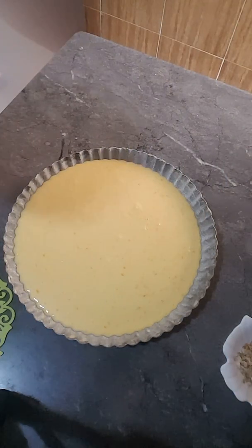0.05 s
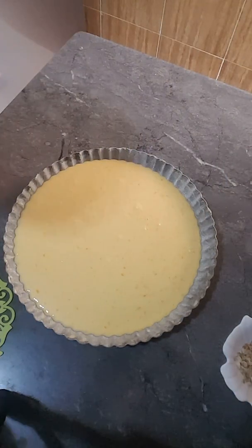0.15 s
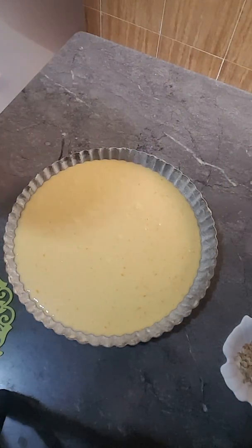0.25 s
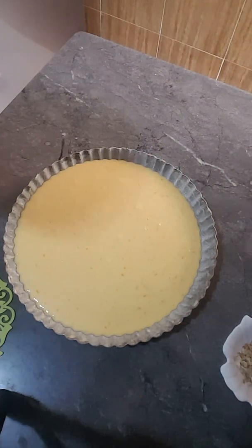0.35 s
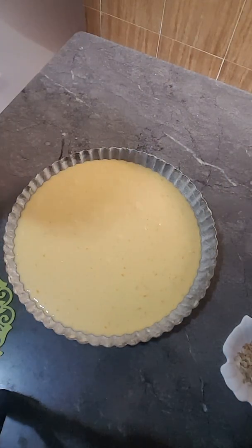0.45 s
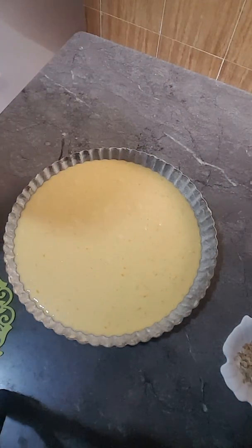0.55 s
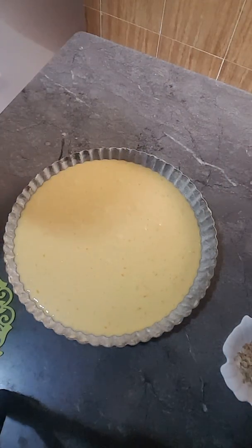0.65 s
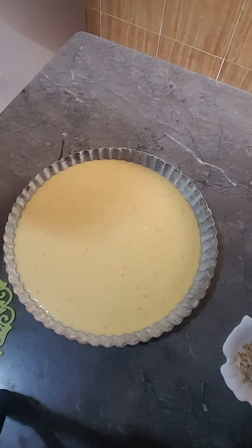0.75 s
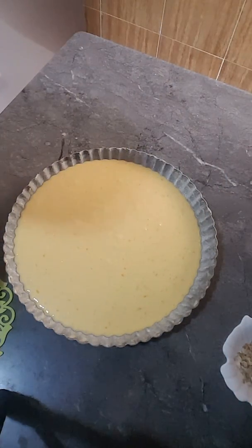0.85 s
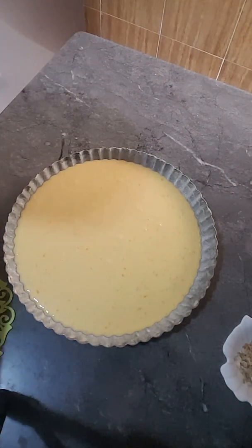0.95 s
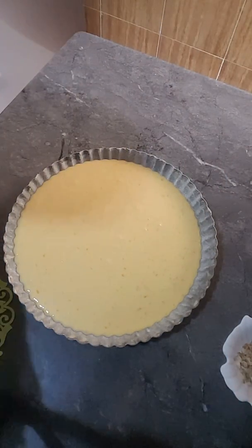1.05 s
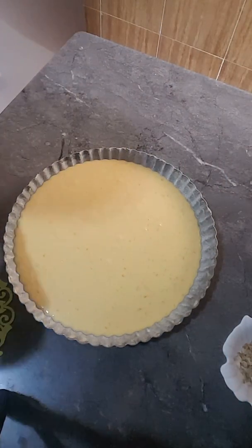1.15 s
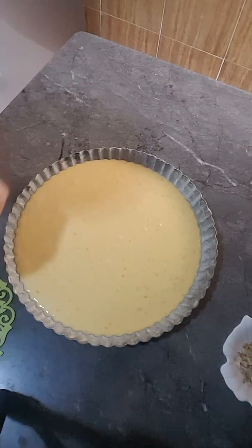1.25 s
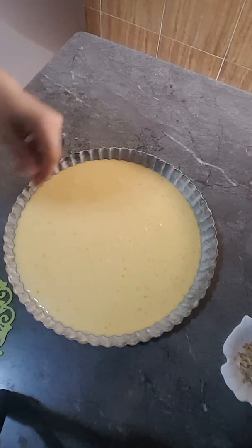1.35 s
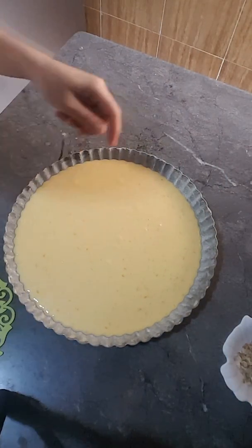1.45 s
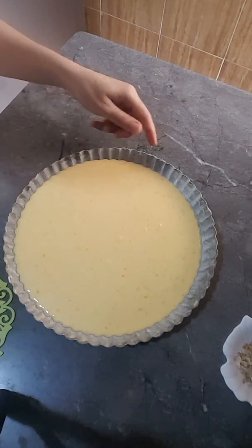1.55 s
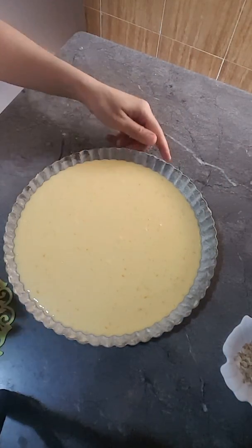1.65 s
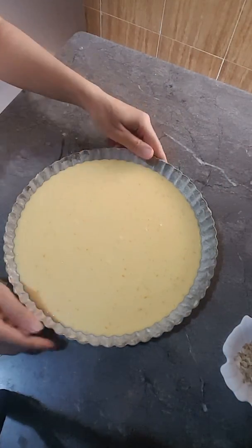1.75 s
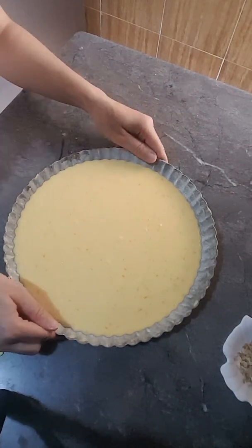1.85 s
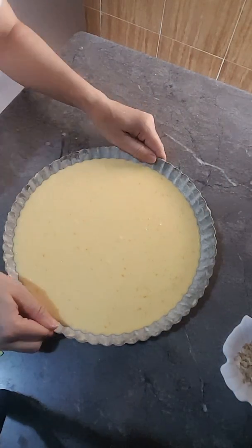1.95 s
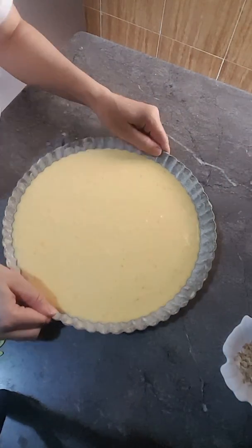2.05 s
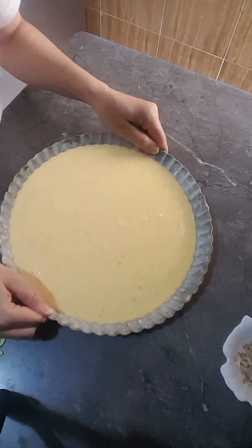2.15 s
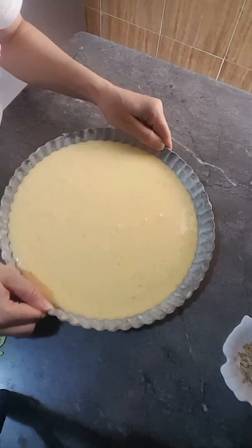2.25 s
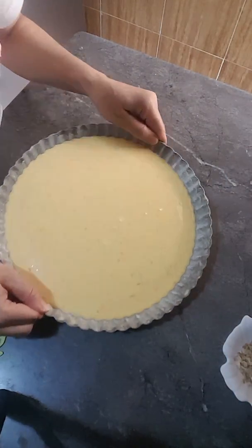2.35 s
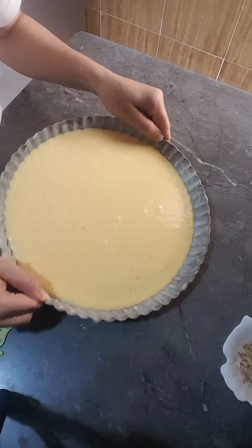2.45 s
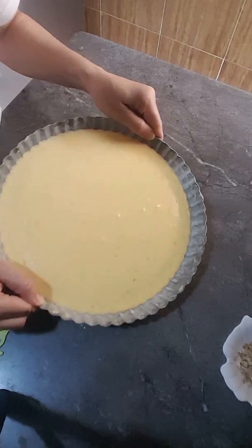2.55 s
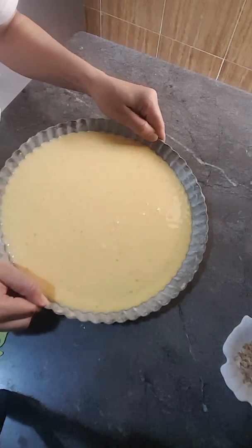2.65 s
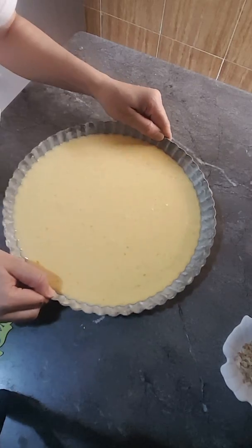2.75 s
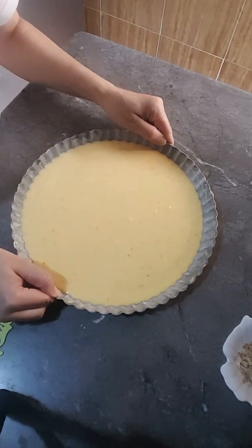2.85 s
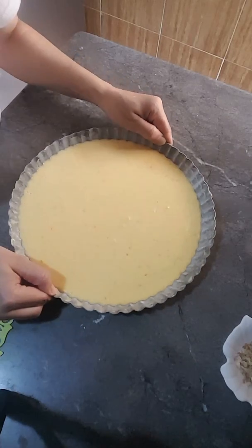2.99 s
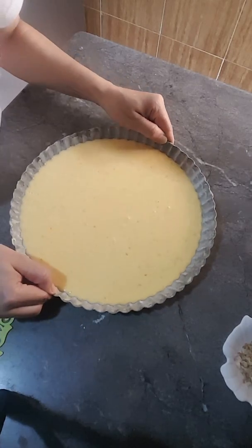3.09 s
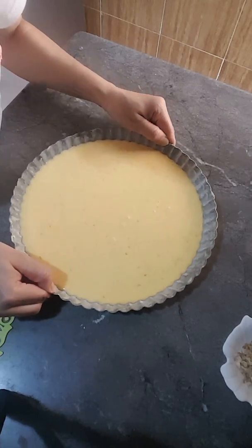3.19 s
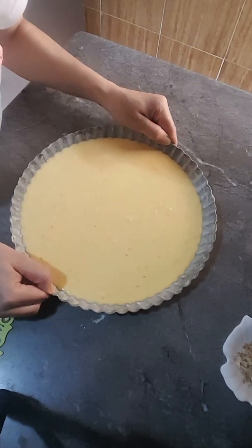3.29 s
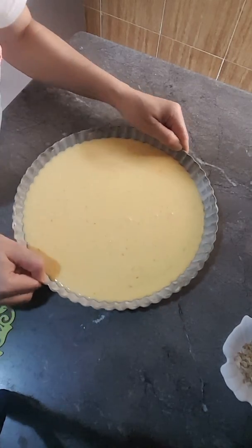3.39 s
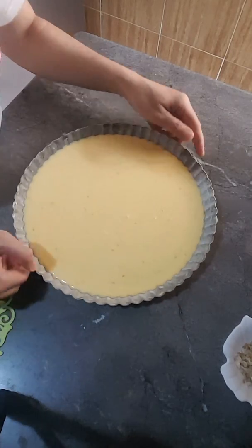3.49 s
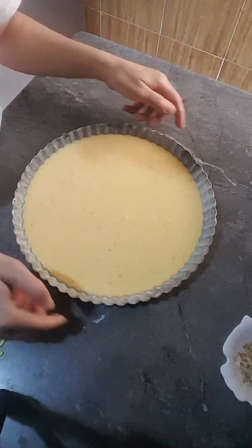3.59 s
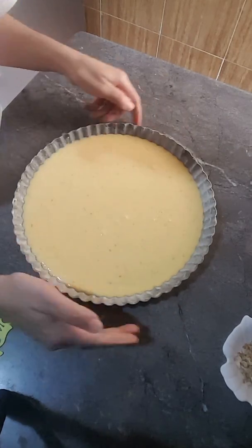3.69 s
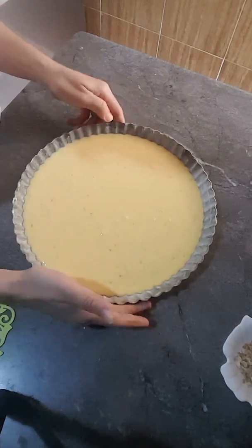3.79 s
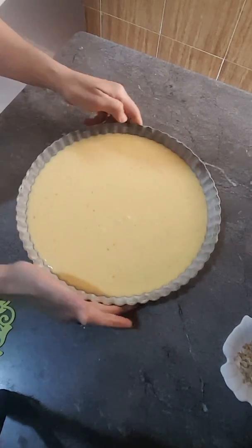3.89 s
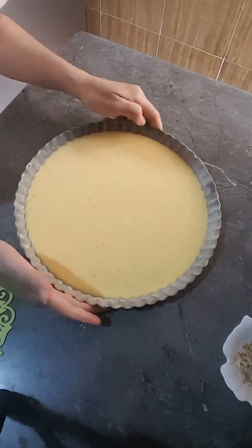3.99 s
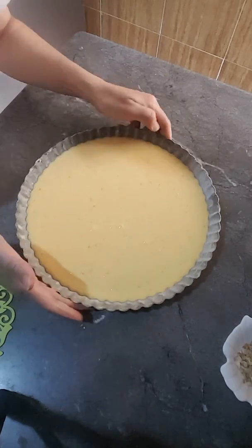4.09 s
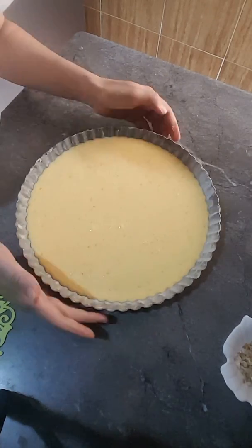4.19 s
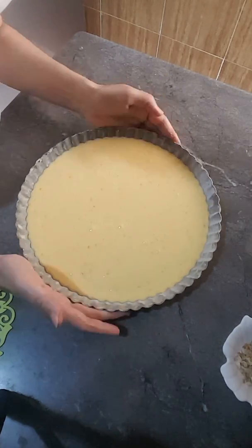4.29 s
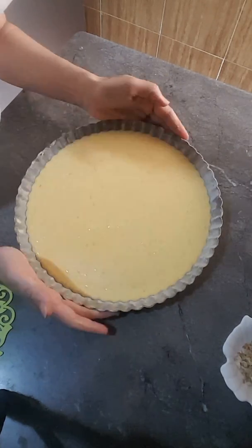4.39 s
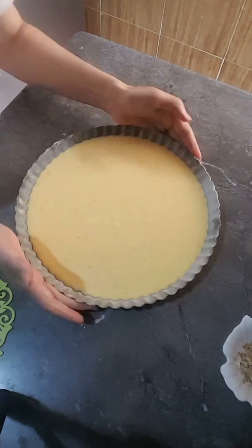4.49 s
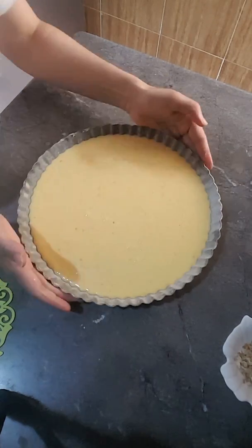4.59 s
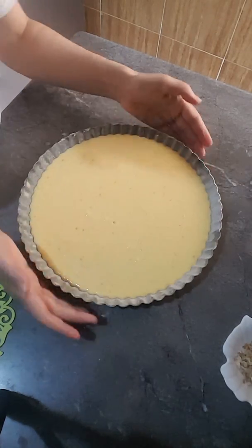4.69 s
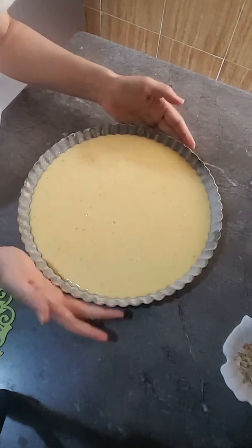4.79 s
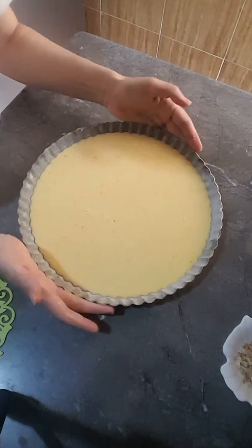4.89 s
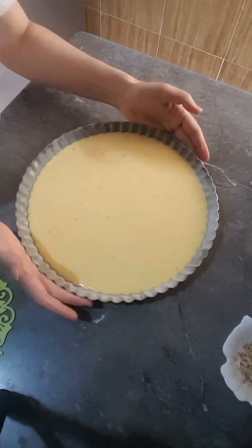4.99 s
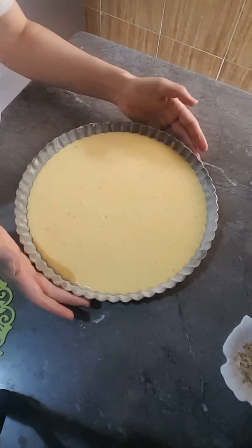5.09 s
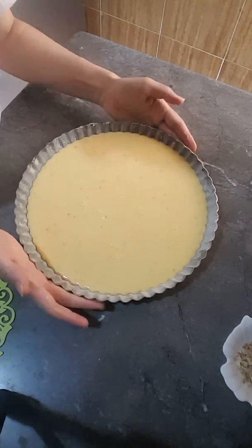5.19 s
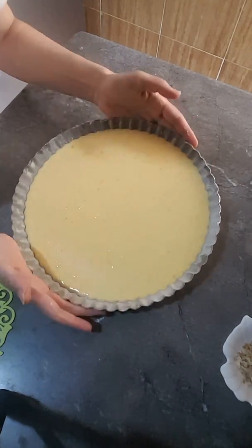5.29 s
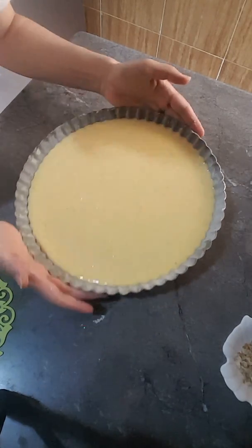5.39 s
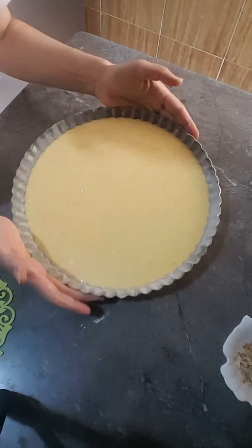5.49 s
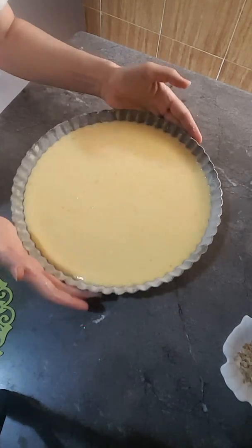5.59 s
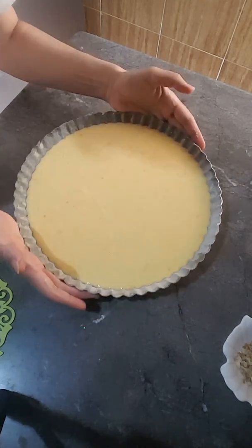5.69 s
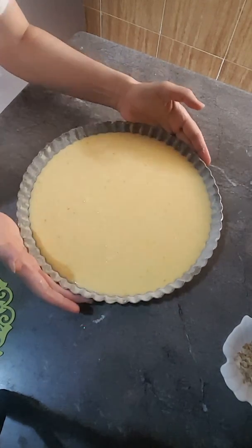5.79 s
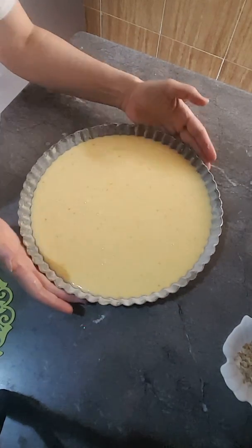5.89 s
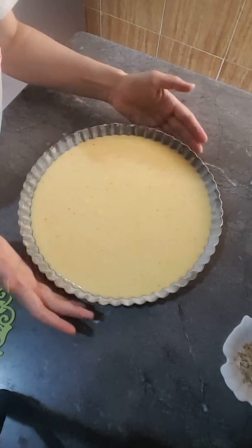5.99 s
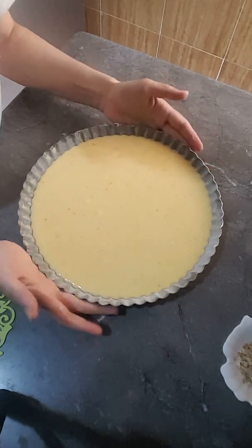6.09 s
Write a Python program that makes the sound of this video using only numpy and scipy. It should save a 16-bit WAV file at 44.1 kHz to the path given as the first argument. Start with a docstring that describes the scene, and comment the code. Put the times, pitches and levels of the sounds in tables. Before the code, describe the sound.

In a small tiled kitchen, a bowl clunks down softly, then a full fluted metal tin bangs and rattles briefly on stone, again and again.

```python
"""A spatula taps and wipes a bowl, which is put down; then a fluted metal tin of batter is lifted and dropped on stone.
Most drops land on the rim first with a clack, then slap flat and rattle to rest; the batter damps the ring.
Contacts drive the decaying modes and noisy crack of each vessel; rubs drive them with a swell of tiny catches.
The counter booms under the drops, and a small tiled kitchen answers with early reflections and a dense tail.
Filtered noise makes the still air, and wavering sines make the low hum of an appliance."""
import sys
import numpy as np
from scipy import signal
from scipy.fft import rfft, irfft
from scipy.io import wavfile

SR = 44100
rng = np.random.default_rng(int(sys.argv[2]) if len(sys.argv) > 2 else 0)


def dump(signal):
    """Clip the signal to [-1, 1] and save it as 16-bit WAV at the path in sys.argv[1]."""
    limited = np.clip(np.atleast_2d(signal).T, -1, 1)
    pcm = np.round(limited * 32767).astype(np.int16)
    wavfile.write(sys.argv[1], SR, pcm)


N = 270774

RING = 8192  # samples in one contact response
FREQS = np.fft.rfftfreq(RING, 1 / SR)
TOP_HZ = 15750  # top of the microphone's band
AIR_DB = -54.5  # rms of the still air before the microphone
SPOT_DB, SPOT_OCTAVES = 4.5, .17  # lift and half-width of the modes favoured by the point of contact
CHOKE_DB = 2  # extra damping at flatness 1, in proportion to flatness

# In the contact tables flatness is 0 on the rim, 0.5 on the heel of the bottom, 1 flat on the whole bottom;
# tick_db lifts the treble, and spot_hz is the mode favoured by the point of contact.
# single contacts of the tin on the stone: rim clacks, heel knocks, light touches and some rebounds:
# start_s, force_db, flatness (0-1), tick_db, spot_hz
TIN_KNOCKS = [(2.2805, 16.5, 0.05, -5, 1048), (2.538, 30.5, 0, 0, 1095), (2.7755, 14.5, .35, -12, 800),
              (2.9205, 29, 0, -7, 1350), (2.933, 33.5, 0.18, 3, 650), (2.997, 26, 0.6, 9, 330),
              (3.0835, 18.5, 0.52, -4, 1000), (3.119, 19.5, 0.69, -4.5, 487), (3.149, 12, 0.62, -4, 600),
              (3.262, 28.5, 0.06, -0.5, 1440), (3.301, 26.5, 0.62, 1.5, 686),
              (3.3305, 30.5, 0.14, 2.5, 1620), (3.4255, 28, 0.07, 5, 1600), (4.144, 24, 0, -2.5, 1040),
              (4.164, 28.5, 0.12, -4, 930), (4.627, 22.5, 0.07, -3.5, 1370), (4.907, 3, 1, -14, 330),
              (4.948, 3, 1, -15, 400), (5.0985, 33, 0.6, -3.5, 600), (5.11, 23, 0.14, 5.5, 1290),
              (5.329, 15, 0.74, -10, 620), (5.8927, 34, .18, -1, 700), (5.965, 7, 0.06, -0.5, 1080)]
# the tin comes down with its full weight: start_s, force_db, flatness (0-1), tick_db, spot_hz,
# boom_db (of the counter), rattle_db (first bounce relative to the blow)
TIN_DROPS = [(2.939, 37.5, 0.98, 1, 330, -34.5, -4.5), (3.438, 34.5, 0.71, 7, 316.3, -43, -6.5),
             (4.153, 33, 0.7, -9.5, 760, -21, -1.5), (4.6026, 40, 0.85, 5, 483, -21, -7.5),
             (5.116, 30, 0.7, -3.5, 349.7, -39, -9), (5.977, 36.5, 0.84, -5.5, 370, -23.5, -26)]
# the tin dragged over the stone: start_s, length_s, level_db
TIN_SLIDES = [(1.86, 0.13, -64.5), (3.11, 0.063, -51), (3.9, 0.081, -55.5), (4.4, 0.34, -54.5),
              (5.066, 0.049, -40.5)]
# modes of the filled tin, before scatter and further damping: pitch_hz, width_hz, level_db
TIN_MODES = [(202, 242, -1.5), (336, 31, -6.5), (388, 6.5, -3), (478, 250, 0), (432, 53, -2.5),
             (581.3, 76, -3.5), (686, 58, 0.5), (750, 26, -1.5), (845, 90, -3), (934, 6.4, 0),
             (1031.6, 42.5, 3), (1131, 16, -6), (1336, 32.8, 2.5), (1499, 13, -6.5), (1580, 56, -1.5),
             (1718, 100, -2.5), (2279, 56, -2.5), (2524, 110, -10.5), (2910, 150, -9.5), (3190, 88, -27)]
# drive of the tin, wider contacts favouring lower modes: pitch_hz, rim_db, heel_db, flat_db
TIN_DRIVE = [(118, -2, -7, -11), (370, -8, -3.5, 3.5), (666, 0.5, -1, -10.5), (970, -2, -5.5, -16.5),
             (1328, 2, -9.5, -16), (3010, -10, -24.5, -25.5)]
# the spatula knocks the bowl twice, then the bowl meets the counter:
# start_s, force_db, flatness (0-1), tick_db, spot_hz
BOWL_TAPS = [(0.002, 10, 0.02, -1, 590), (0.3205, 8, 0.06, 1.5, 530), (1.0865, 29, 0.4, -6.5, 2020)]
# the bowl tips onto its base and rocks: start_s, force_db, flatness (0-1), tick_db, spot_hz,
# boom_db (of the counter), rattle_db (first bounce relative to the blow)
BOWL_LANDINGS = [(1.106, 23, 0.99, -1, 380, -32.5, -14.5)]
# the spatula wiping the bowl: start_s, length_s, level_db
BOWL_WIPES = [(.02, 0.19, -52.5), (.46, 0.16, -59.5), (.92, 0.05, -65)]
# modes of the bowl, before scatter and further damping: pitch_hz, width_hz, level_db
BOWL_MODES = [(138, 96, -4), (203, 78, 5.5), (375, 16, -0.5), (393.65, 24.7, 8), (616, 33, -3),
              (697, 100, -0.5), (760, 130, -4.5), (985, 230, -4), (1300, 46, 3.5), (1780, 76, -1),
              (1966, 110, -3.5), (2310, 120, -4), (2780, 800, -10)]
# drive of the bowl, by width of contact: pitch_hz, rim_db, heel_db, flat_db
BOWL_DRIVE = [(120, -6, -4.5, -2), (330, 2.5, -0.5, 3.5), (650, 2, 0, -9), (960, -4, -6.5, -13),
              (1300, -2.5, -25.5, -20), (2080, -11, -10, -25), (3170, -9.5, -10, -28)]
# dense upper modes of either vessel: pitch_hz, level_db
UPPER_MODES = [(600, -24.5), (1500, -11), (2500, -14), (3500, -20.5), (4500, -25), (5700, -28.5),
               (7000, -44.5), (9500, -60), (12000, -49.5), (15500, -55)]
# first reflections from backsplash and cupboards: delay_ms, left_db, right_db
EARLY_ECHOES = [(3.3478, -14.5, -12.5), (8.95, -18.5, -16.5), (14.09, -11.5, -9.5), (23.86, -23, -16)]
# bands of the kitchen's dense tail, relative to the sound sent into it: pitch_hz, level_db, t60_s
TAIL_BANDS = [(49.8, 1.5, 0.19), (95.2, 7.5, 0.68), (200, -1.5, 0.46), (380, -6, 0.42), (730, -2, 0.41),
              (1458, -4, 0.41), (2980, -4, 0.43), (5920, -6, .42), (8950, -1, 0.3)]
# standing waves between the walls: pitch_hz, t60_s, level_db
STANDING_WAVES = [(94.66, 0.39, 12), (127, 0.19, 10), (174.7, 0.75, 9.5), (197, .25, -3.5),
                  (305.6, 0.28, 0), (332.5, 0.23, -3.5), (421, 0.45, 2.5), (518, 0.19, 1), (587, 0.21, 3.5)]
# left port minus right port: pitch_hz, difference_db
PORT_BALANCE = [(100, -0.5), (330, -2), (500, 0.5), (740, 3), (1130, -2), (1700, -7.5), (2600, -3.5),
                (5000, -6), (12000, -5)]
# spectral shape of the still air, relative: pitch_hz, level_db (per Hz)
AIR_SHAPE = [(25, -38), (45, -1.5), (75, -15), (100, -2.5), (170, -5.5), (260, -13), (400, -10),
             (520, -21.5), (750, -18), (1000, -25), (2500, -33), (5000, -42), (9500, -50), (13000, -46)]
# appliance hum, before its waver: pitch_hz, level_db (rms)
HUM_LINES = [(96.9, -60.5), (118.4, -66.5), (436, -70), (581.4, -71.5)]


def undb(db):
    """Decibels to gain."""
    return 10 ** (np.asarray(db) / 20)


def along(hz, points, axis=1):
    """Read one column of a table on a log-frequency axis."""
    table = np.array(points, float)
    return np.interp(np.log(np.maximum(hz, 1)), np.log(table[:, 0]), table[:, axis])


def causal(db):
    """Minimum-phase response with the given gains: nothing sounds before the blow."""
    cepstrum = irfft(np.log(undb(db)))
    cepstrum[1:RING // 2] *= 2
    cepstrum[RING // 2 + 1:] = 0
    return np.exp(rfft(cepstrum))


def add(out, s, sound):
    """Mix a sound in at time s."""
    i = max(int(s * SR), 0)
    out[:, i:i + sound.shape[1]] += sound[:, :N - i]


def tin():
    """The filled tin: single knocks, drops that chatter briefly, and drags over the stone."""
    drops = chatter(TIN_DROPS, count=4, gap_s=.0135, shrink=.85, loss_db=2.5, tilt=0.21, bounce_tick_db=2)
    hits = strikes(TIN_KNOCKS + drops, TIN_MODES, TIN_DRIVE, scatter_db=1.4, detune=0.013,
                   crack_s=0.006, damping=1.16, tick_hz=2983)
    return hits + rubs(TIN_SLIDES, TIN_MODES, grain_db=-1.5, dull_hz=600, damping=4.5)


def bowl():
    """The mixing bowl: wiped and tapped with the spatula, then put down to rock on its foot."""
    rocking = chatter(BOWL_LANDINGS, count=5, gap_s=.037, shrink=.9, loss_db=2.0, tilt=.85, bounce_tick_db=5.5)
    hits = strikes(BOWL_TAPS + rocking, BOWL_MODES, BOWL_DRIVE, scatter_db=1.54, detune=0.012,
                   crack_s=0.004, damping=1.18, tick_hz=4500)
    return hits + rubs(BOWL_WIPES, BOWL_MODES, grain_db=1, dull_hz=1300, damping=1.84)


def chatter(drops, count, gap_s, shrink, loss_db, tilt, bounce_tick_db, uneven=.08, wobble=0.21):
    """A blow and its bounces, ever weaker and at shrinking, slightly uneven gaps, as the angle wobbles."""
    contacts = []
    for s, force_db, flatness, tick_db, spot_hz, _, rattle_db in drops:
        contacts.append((s, force_db, flatness, tick_db, spot_hz))
        for k, (late, lean) in enumerate(rng.standard_normal((count, 2))):
            s = s + gap_s * shrink ** k * (1 + uneven * late)
            bounce_db = force_db + rattle_db - k * loss_db
            bounce_flatness = 1 - tilt + wobble * lean
            contacts.append((s, bounce_db, bounce_flatness, bounce_tick_db, spot_hz))
    return contacts


def strikes(contacts, modes, push, scatter_db, detune, crack_s, damping, tick_hz):
    """A flat landing pushes long, thuds and chokes the ring; a landing on the edge is short and clacks."""
    out = np.zeros((2, N))
    fade = np.minimum(1, np.linspace(2, 0, RING)) ** 2
    rim, heel, flat = (along(FREQS, push, axis=k + 1) for k in range(3))
    treble = along(FREQS, [(tick_hz / 2, 0), (tick_hz, 1)])
    for s, force_db, flatness, tick_db, spot_hz in contacts:
        # -1 on the rim, 0 on the heel, 1 flat
        lean = np.clip(2 * flatness - 1, -1, 1)
        extreme = flat if lean > 0 else rim
        push_db = heel + abs(lean) * (extreme - heel)
        octaves_off = np.log2(np.maximum(FREQS, 1) / spot_hz)
        spot_db = SPOT_DB / (1 + (octaves_off / SPOT_OCTAVES) ** 2)
        choked = damping * undb(CHOKE_DB * flatness)
        response = vessel(modes, scatter_db, detune, crack_s, damping=choked)
        drive = causal(force_db + push_db + spot_db + tick_db * treble)
        add(out, s, fade * irfft(response * drive))
    return out


def vessel(modes, scatter_db, detune, crack_s, damping=1, lag_ms=0.055, turn_hz=1000, radiate_hz=280,
           build_cycles=0.36, crack_rise_s=0.00069):
    """Response to one contact; where it lands shifts the weight and pitch of every mode."""
    t = np.arange(RING) / SR
    hz, width, db = np.array(modes, float).T[:, :, None]
    weight, pitch, left, right = rng.standard_normal((4, len(modes), 1))
    # each mode builds up as the bending wave crosses the vessel, then dies away
    build = 1 - np.exp(-t * hz / build_cycles)
    life = build * np.exp(-np.pi * width * damping * t) * np.sqrt(damping)
    rings = undb(db + scatter_db * weight) * 2 * np.pi * width / SR * life
    angle = 2 * np.pi * hz * (1 + detune * pitch) * t
    # low modes push the air together; higher ones radiate in lobes, with another phase at each port
    ring = rfft([(rings * np.sin(angle + port * hz / turn_hz)).sum(0) for port in (left, right)])
    ring *= causal(along(FREQS, [(3500, 0), (9000, -12.0)]))
    crack_shape = (1 - np.exp(-t / crack_rise_s)) * np.exp(-t / crack_s) * np.sqrt(2 / (crack_s * SR))
    crack = rng.standard_normal((2, RING)) * crack_shape
    response = ring + rfft(crack) * causal(along(FREQS, UPPER_MODES))
    # the left port is a little further away
    response[0] *= np.exp(-2j * np.pi * FREQS * lag_ms / 10 ** 3)
    # a small vessel radiates long waves poorly
    return response * 1j * FREQS / (radiate_hz + 1j * FREQS)


def rubs(strokes, modes, grain_db, dull_hz, damping):
    """Friction: a swell of tiny uneven catches, spread over three places on the hand-held vessel."""
    out = np.zeros((2, N))
    for s, length, db in strokes:
        size = int(length * SR)
        sound = 0
        for place in range(3):
            grains = rng.standard_normal(size) * undb(grain_db * rng.exponential(size=size))
            catches = grains * (rng.random(size) < .02)  # about one sample in fifty catches
            body = vessel(modes, scatter_db=2, detune=.03, crack_s=.005, damping=damping)
            body = irfft(body / (1 + 1j * FREQS / dull_hz))
            sound = sound + signal.fftconvolve((catches * np.hanning(size))[None], body, axes=1)
        rms = np.sqrt(np.sum(sound ** 2) / (2 * size))
        add(out, s, sound * undb(db) / rms)
    return out


def counter(drops, hz, t60, rise_s=0.01, overtone=1.5, overtone_db=-5):
    """The slab and its cabinet boom low under each drop, quickly damped; the pitch depends on the place."""
    out = np.zeros((2, N))
    t = np.arange(SR // 2) / SR
    swing = np.sin(2 * np.pi * hz * t) + undb(overtone_db) * np.sin(2 * np.pi * hz * overtone * t)
    boom = swing * (1 - np.exp(-t / rise_s)) * np.exp(-np.log(1000) * t / t60)
    for s, *_, boom_db, _ in drops:
        add(out, s, undb(boom_db) * boom[None] / boom.max())
    return out


def reflections(sound, dull_hz=3000):
    """Nearby surfaces repeat every knock, dulled, within a few hundredths of a second."""
    out = np.zeros((2, N))
    soft = signal.sosfilt(signal.butter(1, dull_hz, fs=SR, output="sos"), sound)
    for ms, left_db, right_db in EARLY_ECHOES:
        add(out, ms / 10 ** 3, soft * undb([[left_db], [right_db]]))
    return out


def kitchen(sound, first_s=0.0019, build_s=0.003):
    """Tiles and cupboards return a dense tail just after the direct sound; bass lingers in standing waves."""
    t = np.arange(SR) / SR
    hz, noise = diffuse(size=SR)
    onset = 1 - np.exp(-np.maximum(t - first_s, 0) / build_s)
    tail = 0
    for k, (_, db, t60) in enumerate(TAIL_BANDS):
        # each band crossfades into its neighbours
        share = along(hz, [(row[0], j == k) for j, row in enumerate(TAIL_BANDS)])
        fade = onset * np.exp(-np.log(1000) * t / t60)
        tail = tail + undb(db) * irfft(noise * share, SR) * fade / np.sqrt(np.sum(fade ** 2))
    for mode_hz, t60, db in STANDING_WAVES:
        decay = np.log(1000) / t60
        wave = onset * np.exp(-decay * t) * np.cos(2 * np.pi * mode_hz * t)
        tail = tail + undb(db) * 2 * decay / SR * wave
    return signal.fftconvolve(sound, tail, axes=1)[:, :N]


def diffuse(size, apart_hz=1000):
    """Spectra of noise from all sides at two ports: alike in the bass, unrelated in the treble."""
    hz = np.fft.rfftfreq(size, 1 / SR)
    alike = np.sinc(hz / apart_hz)
    mid, side = rfft(rng.standard_normal((2, size)))
    signs = np.array([[1], [-1]])
    return hz, (mid * np.sqrt(1 + alike) + signs * side * np.sqrt(1 - alike)) / np.sqrt(2)


def background(waver_db=2):
    """Still air as shaped diffuse noise, and an appliance hum wavering softly in level and phase."""
    t = np.arange(N) / SR
    hz, noise = diffuse(size=N, apart_hz=1268)
    air = irfft(noise * undb(along(hz, AIR_SHAPE)), N)
    knots = np.arange(0, 7, .2)  # s
    hum = 0
    for line_hz, db in HUM_LINES:
        waver = np.interp(t, knots, rng.standard_normal(len(knots)))
        level = np.sqrt(2) * undb(db + waver_db * waver)
        hum = hum + level * np.sin(2 * np.pi * line_hz * t + waver)
    return air / np.std(air) * undb(AIR_DB) + hum


def scene():
    """Tin and bowl in the kitchen; the right port hears more treble."""
    near, far = tin(), bowl()
    booms = counter(TIN_DROPS, hz=94, t60=0.15) + counter(BOWL_LANDINGS, hz=40, t60=0.15)
    room = reflections(near + far) + kitchen(undb(-1.0) * near + undb(2.0) * far)
    sound = near + far + booms + room
    # half the difference goes to each port
    lean_db = along(np.fft.rfftfreq(2 * N, 1 / SR), PORT_BALANCE) * np.array([[1], [-1]]) / 2
    return irfft(rfft(sound, 2 * N) * undb(lean_db))[:, :N] + background()


def record(dry, low_hz=45):
    """The microphone sheds deep bass, rounds the hardest peaks and cuts the top."""
    sound = signal.sosfilt(signal.butter(2, low_hz, "high", fs=SR, output="sos"), dry)
    rounded = sound / (1 + (sound / 1.15) ** 4) ** .25  # peaks level off towards 1.15
    return signal.sosfilt(signal.ellip(8, .2, 70, TOP_HZ, fs=SR, output="sos"), rounded)


dry = scene()
out = record(dry)
dump(out)
```